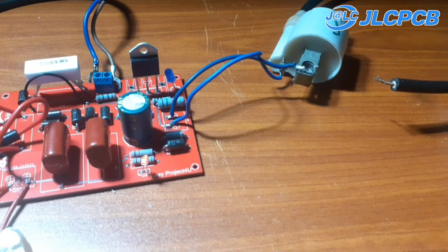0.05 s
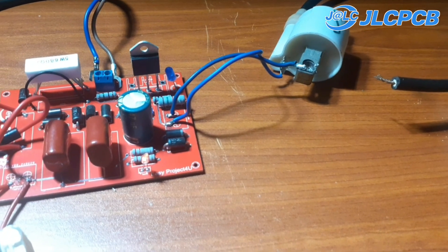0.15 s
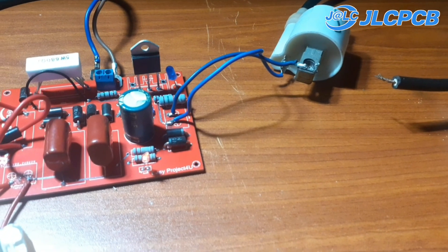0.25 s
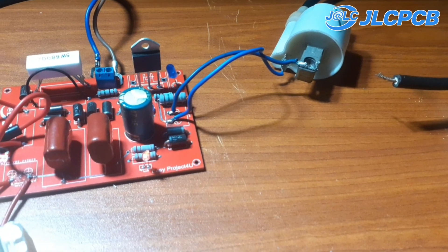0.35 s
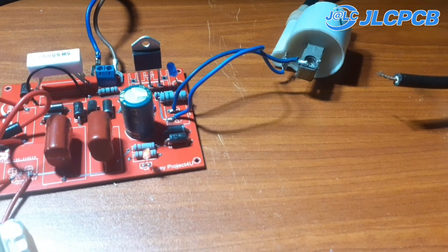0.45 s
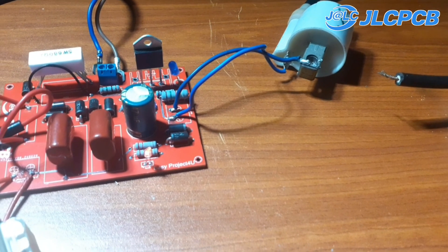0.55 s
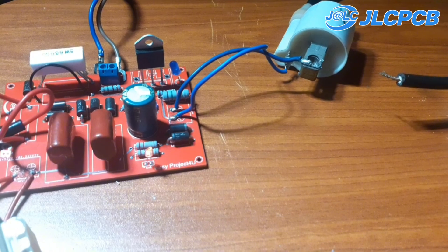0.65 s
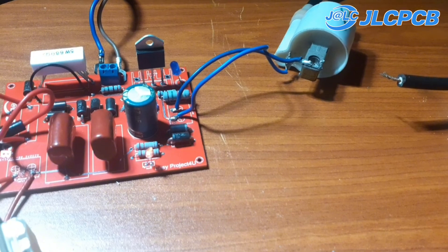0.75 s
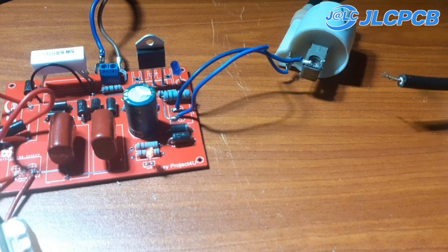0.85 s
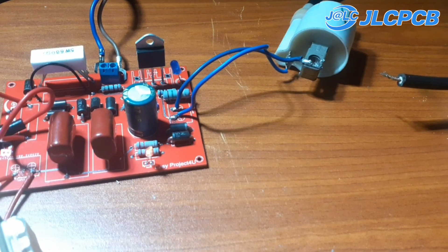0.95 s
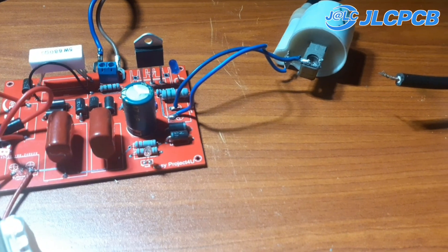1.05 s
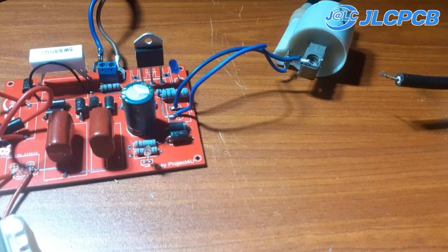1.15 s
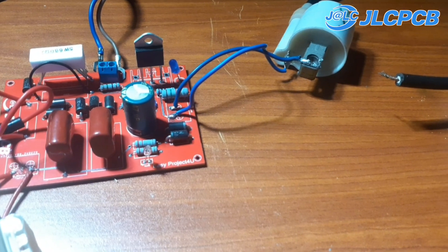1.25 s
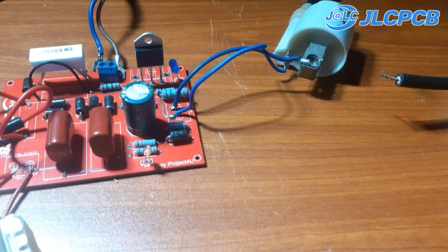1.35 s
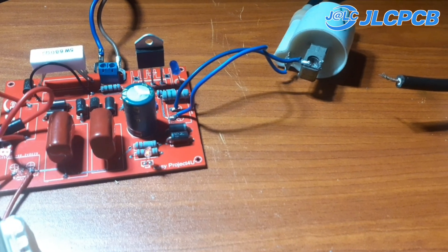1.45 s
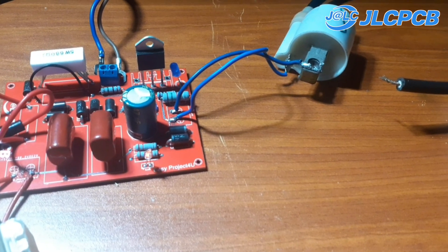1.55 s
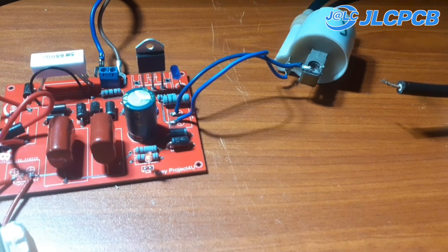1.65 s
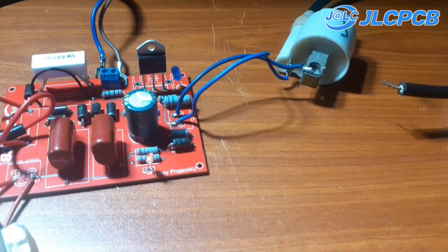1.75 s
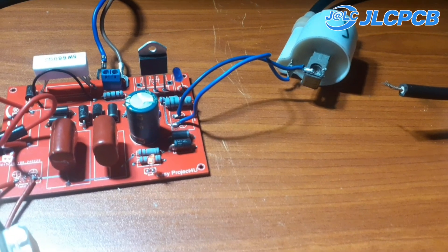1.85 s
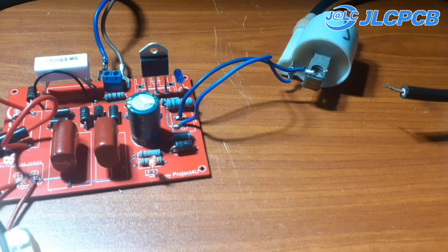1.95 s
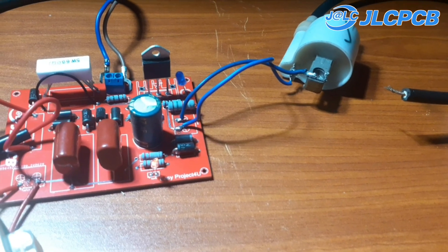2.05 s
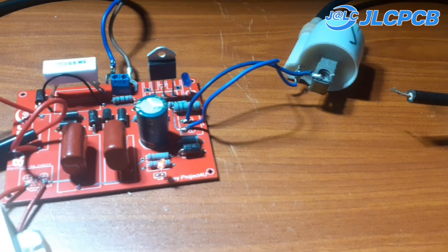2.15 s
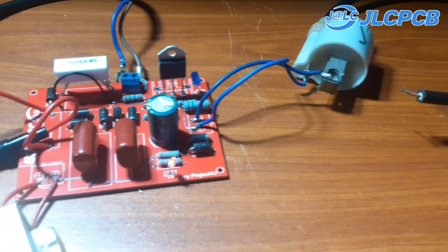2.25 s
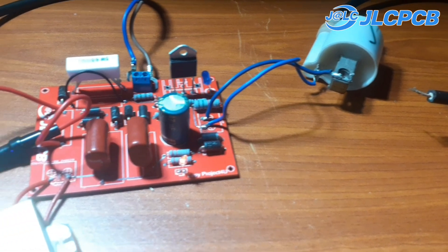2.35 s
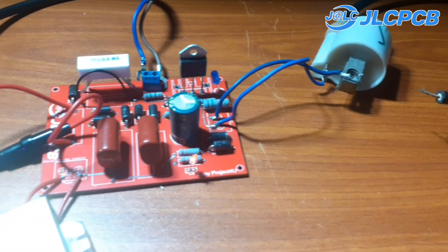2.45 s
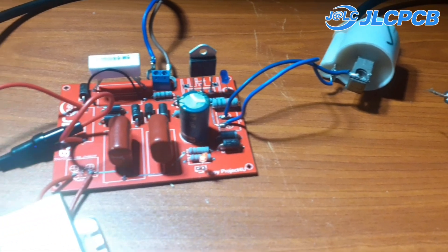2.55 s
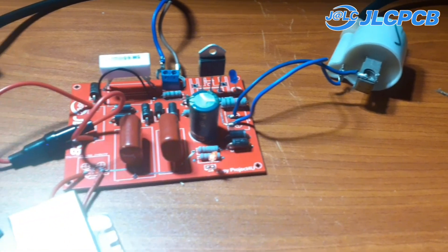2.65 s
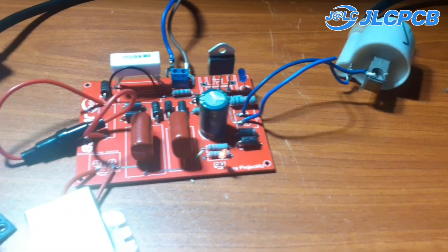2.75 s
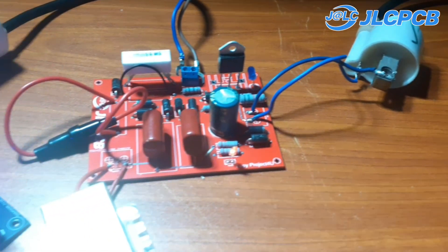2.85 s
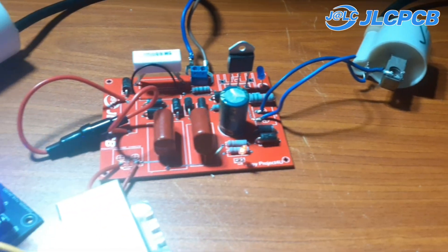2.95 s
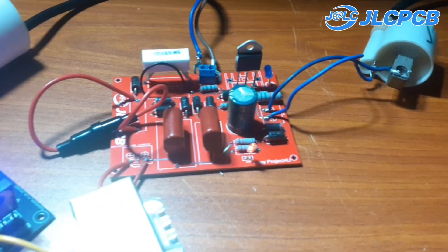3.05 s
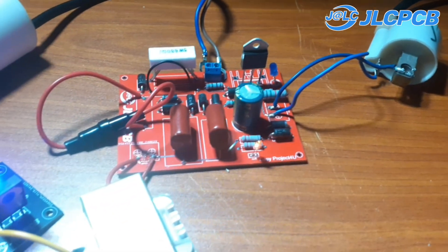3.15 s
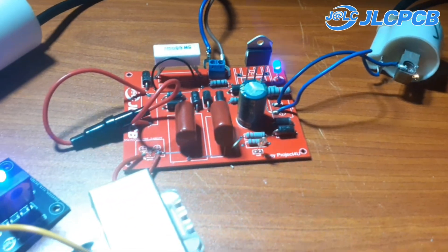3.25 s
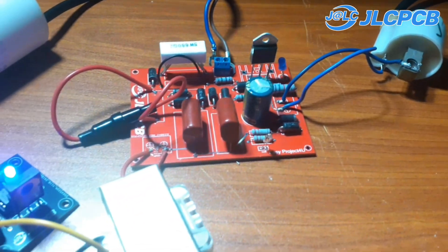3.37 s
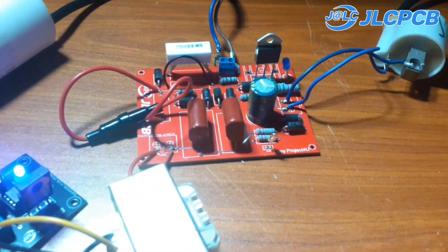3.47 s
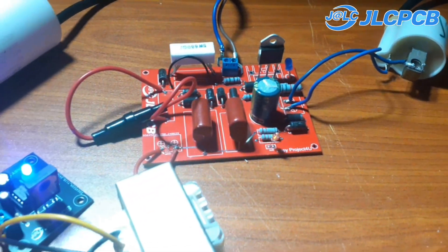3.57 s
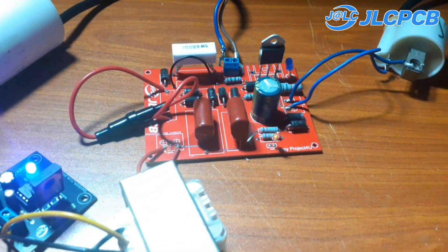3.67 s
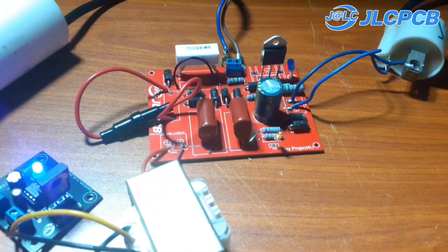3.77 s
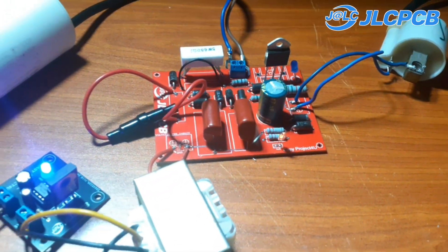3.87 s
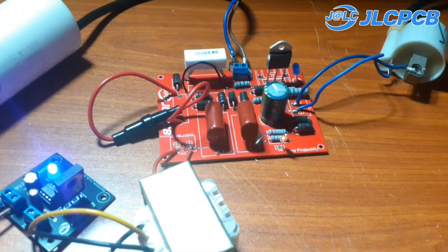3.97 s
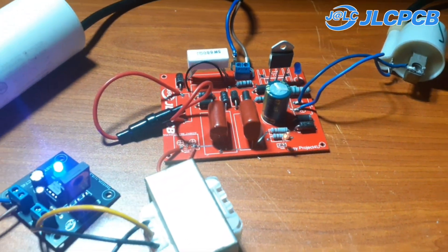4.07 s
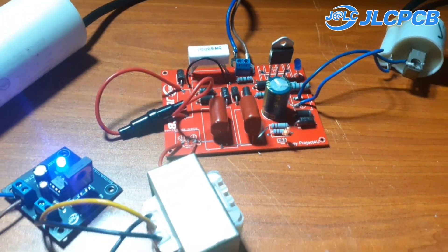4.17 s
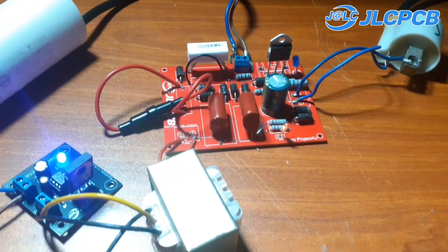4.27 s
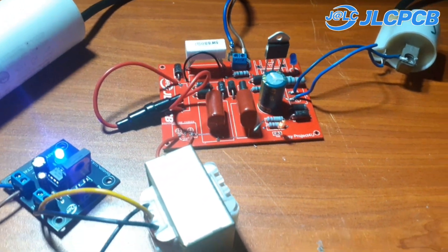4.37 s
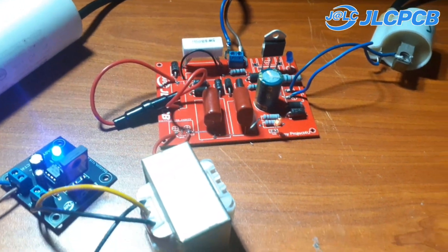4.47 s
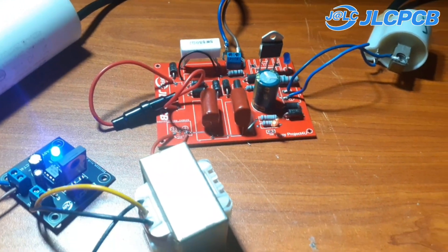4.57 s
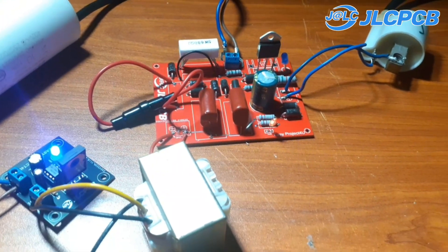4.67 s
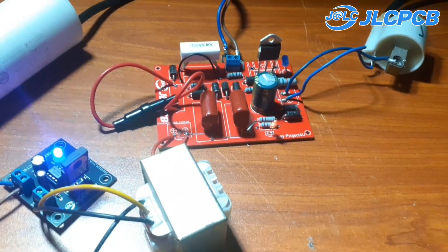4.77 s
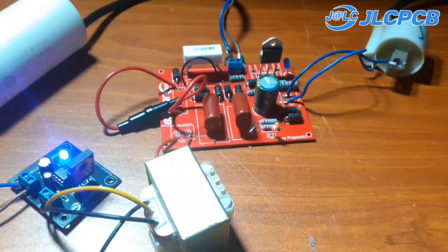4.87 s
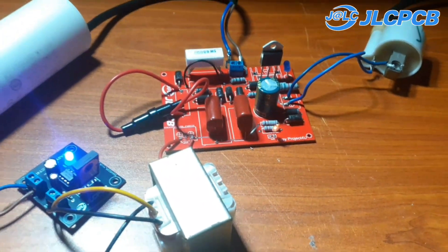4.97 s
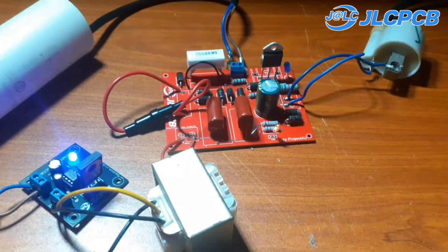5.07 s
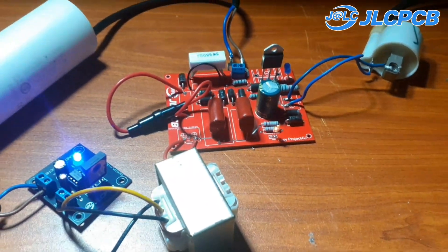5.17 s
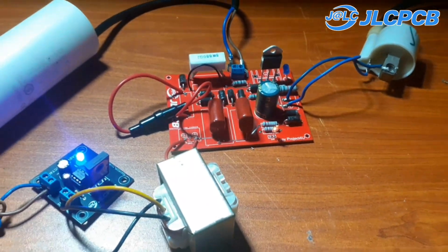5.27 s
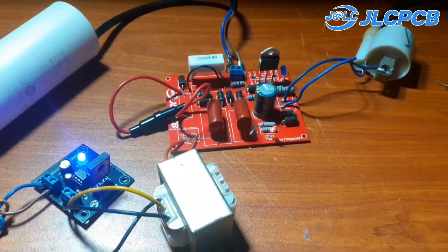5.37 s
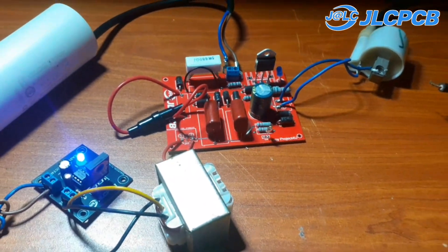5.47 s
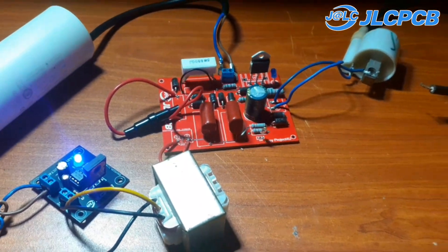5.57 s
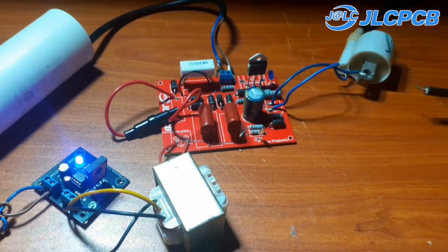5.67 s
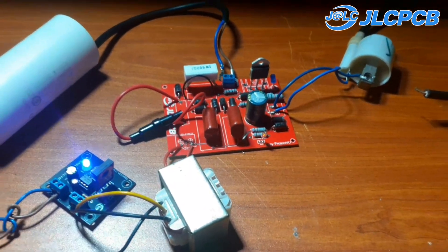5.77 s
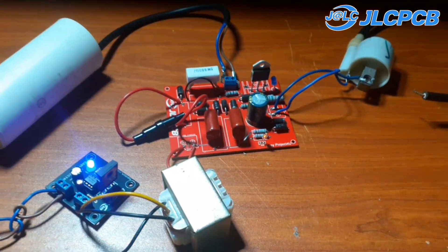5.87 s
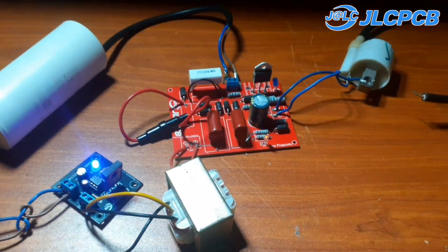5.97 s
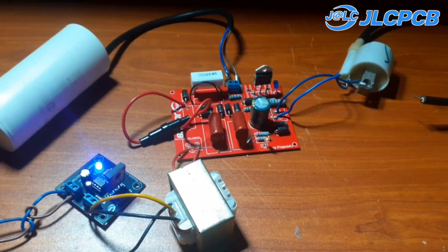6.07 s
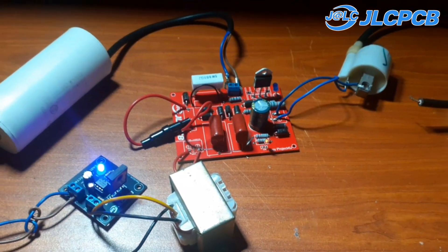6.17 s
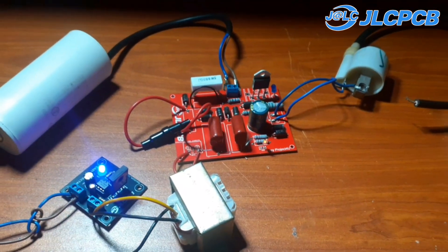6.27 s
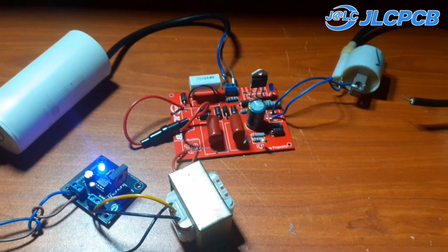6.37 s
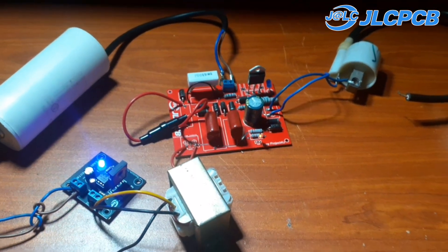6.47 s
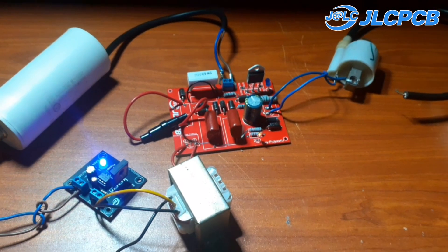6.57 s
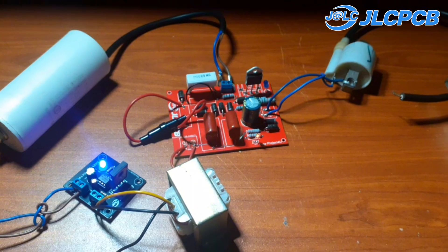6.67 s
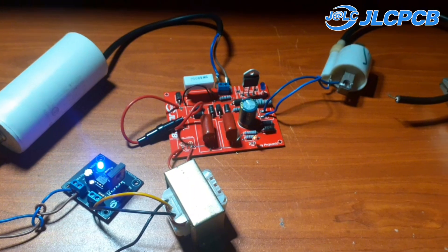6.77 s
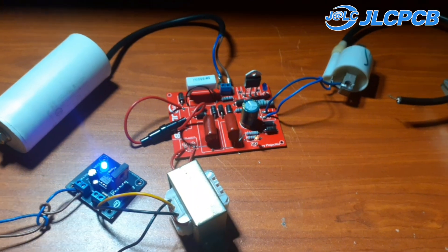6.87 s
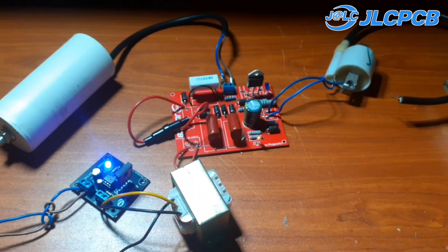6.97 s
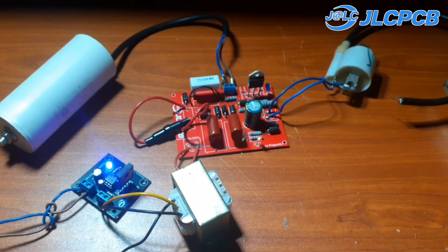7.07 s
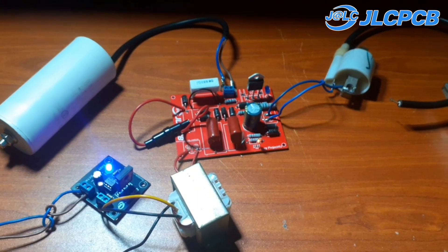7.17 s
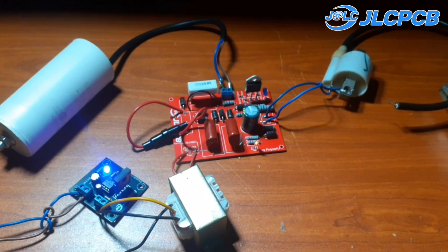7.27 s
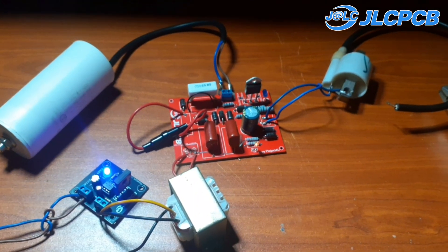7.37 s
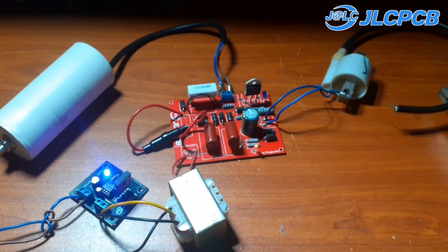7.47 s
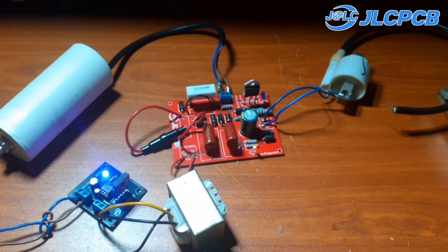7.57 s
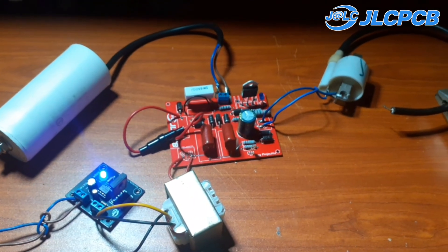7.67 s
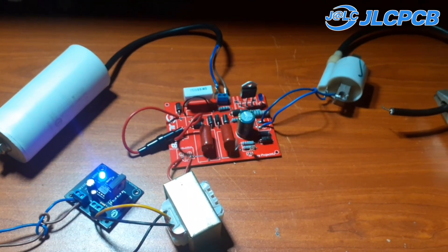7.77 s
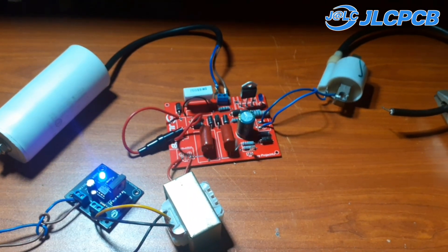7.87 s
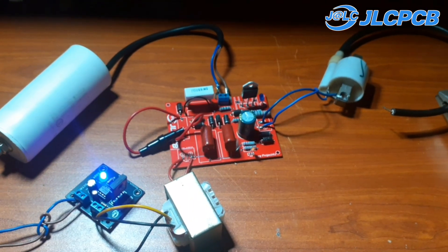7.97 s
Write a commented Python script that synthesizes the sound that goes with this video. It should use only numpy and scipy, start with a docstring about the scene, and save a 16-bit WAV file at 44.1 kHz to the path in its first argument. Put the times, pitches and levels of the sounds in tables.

```python
"""Spark gap on a desk

A small inverter buzzes faintly as it charges capacitors; every 2.2 s a coil snaps a spark across a gap.
The crack scatters off the desk, reverberates in a small room and overdrives a hand-held camera's two
ports. Behind it two detuned hums beat over the room's air, a faint whir swells and fades, one tap sounds."""
import sys
import numpy as np
from scipy import signal
from scipy.fft import rfft, irfft, next_fast_len
from scipy.io import wavfile
from scipy.ndimage import map_coordinates

SR = 44100
rng = np.random.default_rng(int(sys.argv[2]) if len(sys.argv) > 2 else 0)


def to_wav(sig):
    """Store sig (one row per channel, or 1-D mono) as 16-bit WAV at the path in sys.argv[1].

    Samples outside -1..1 are clipped; the rate is SR.
    """
    pcm = np.clip(np.atleast_2d(sig), -1, 1) * 32767
    pcm = np.round(pcm).astype(np.int16)
    wavfile.write(sys.argv[1], SR, pcm.T)  # frames by channels


N = 353682

# Discharges: t/s, crack gain/dB, body gain/dB, treble gain/dB, desk echo delay/ms, left minus right/dB,
# room gain/dB, left and right thump amplitude (signed)
SPARKS = [(1.0405, 8.3, -3, 0.23, 0.35, 4, -19.5, 0.2, -0.13),
          (3.2483, 9.7, 9, -0.81, 0.2, 2.5, -18.5, 0.079, -0.018),
          (5.4403, 1.4, 7.5, 1, 0.18, -0.5, -18.5, -0.21, 0.14),
          (7.6361, 5, 4, -0.63, 0.38, 3, -16, -0.14, -0.047)]


def amp(db):
    """Amplitude ratio: a factor of ten per 20 dB."""
    return 10 ** (np.asarray(db) / 20)


def unit(x):
    """Normalisation to an rms of 1."""
    return x / np.sqrt(np.mean(x ** 2, axis=-1, keepdims=True) + 1e-20)


def along(points, hz):
    """Interpolation of a table's columns on a logarithmic frequency axis."""
    f, *cols = np.transpose(points)
    return np.array([np.interp(np.log(hz + 1), np.log(f + 1), c) for c in cols])


def curves(rows):
    """Linear interpolation of a table's columns in time, one value per sample."""
    s, *cols = np.transpose(rows)
    return [np.interp(np.arange(N) / SR, s, c) for c in cols]


def wobble(rate):
    """Slow random modulation: a spline through `rate` knots a second."""
    return map_coordinates(rng.standard_normal(int(N * rate / SR) + 4), [np.arange(N) * rate / SR])


def filtered(x, response):
    """Linear filtering: the spectrum is multiplied by a frequency response."""
    m = 2 * next_fast_len(x.shape[-1] // 2 + 4096)
    return irfft(rfft(x, m) * response(np.fft.rfftfreq(m, 1 / SR)), m)[..., :x.shape[-1]]


def causal(points):
    """Minimum-phase response with the given gains: no output precedes its cause."""
    def response(hz):
        cepstrum = irfft(np.log(amp(along(points, hz))))
        half = cepstrum.shape[-1] // 2
        cepstrum[..., 1:half] *= 2
        cepstrum[..., half + 1:] = 0
        return np.exp(rfft(cepstrum))
    return response


def resonance(f, centre_hz, width_hz):
    """Response at f of two identical damped resonators in cascade."""
    return (1j * f * width_hz / (centre_hz ** 2 - f ** 2 + 1j * f * width_hz)) ** 2


def noise_band(hz, width_hz, alike):
    """Partly coherent stereo noise through a resonance, rms 1."""
    shared, own = rng.standard_normal(N), rng.standard_normal((2, N))
    return unit(filtered(alike * shared + (1 - alike) * own, lambda f: resonance(f, hz, width_hz)))


def room_tail(size):
    """Diffuse reverberation: noise decays exponentially, each frequency at its own rate."""
    decay_times = [(100, 1), (500, .36), (2000, 0.44), (6000, 0.42), (15000, .26)]  # f/Hz, T60/s
    hz, t, spectrum = signal.stft(rng.standard_normal((2, size)), SR, nperseg=256)
    decay = amp(-60 * t / along(decay_times, hz)[0][:, None])
    return signal.istft(spectrum * decay, SR, nperseg=256)[1][:, :size]


def switching_rate():
    """Loading: the inverter's rate in Hz sags at each discharge and recovers as charge builds."""
    full_hz, sag_hz, recharge_s, spark_period_s = 161.6, 2.0, 1.25, 2.2
    t, fired = np.arange(N) / SR, np.array([row[0] for row in SPARKS])
    fired = np.append(fired[0] - spark_period_s, fired)
    since = t - fired[np.searchsorted(fired, t) - 1]
    return full_hz - sag_hz * np.exp(-(since / recharge_s) ** 2)


def inverter():
    """Impulse excitation: the transformer core ticks once a cycle, heard directly and via the room."""
    # Ticks at the left port as the camera drifts: t/s, level/dB, level/dB near 10 kHz, near 12.5 kHz
    tick_levels = [(0, -63.5, -76.5, -75), (.38, -64, -75, -77), (.43, -59, -76, -72),
                   (1.04, -59.5, -76.5, -72), (1.4, -64.5, -77, -75.5), (2.03, -62, -73, -74),
                   (2.08, -58.5, -74.5, -71), (2.4, -58, -73.5, -68.5), (3.2, -59.5, -71.5, -76),
                   (4.3, -63.5, -75, -76), (5.4, -65, -80, -85), (5.8, -65.5, -80, -77),
                   (7, -65, -81.5, -90), (8, -64.5, -77, -86)]
    near_spectrum = [(1000, -34.5), (1500, -24.5), (2000, -14), (2400, -9), (2750, -2.5), (2950, -6.5),
                     (3350, 2.5), (3800, -5), (4350, -8), (4800, -26), (6500, -21.5), (8300, -25),
                     (16000, -39)]  # direct tick: f/Hz, gain/dB
    high_modes = [
        [(10156, 1400, 0)],
        [(11880, 440, 0.5), (13200, 700, -1)],
    ]  # two groups of modes: f/Hz, width/Hz, gain/dB
    far_spectrum = [(892, -45.5, -47.5), (1390, -17, -16), (1770, -15, -1.5), (2500, -18, -1.5),
                    (3620, -5, 2.5), (4370, -6.5, -17), (5460, -21, -25.5), (6400, -16.5, -9),
                    (8700, -20.5, -12.5), (9910, -12.5, -15.5), (13200, -20.5, -26.5),
                    (16000, -20.5, -34.5)]  # reverberant tick: f/Hz, left gain/dB, right gain/dB
    whine_levels = [(0, -72.5, -80), (2.2, -74.5, -73.5), (2.6, -71, -74.5), (3.3, -70.5, -85),
                    (4.4, -69.5, -99), (6.2, -73, -89.5), (7.1, -72.5, -85.5)]  # top whine: t/s, left level/dB, right level/dB
    core_harmonics = [(1, -81), (2, -82.5), (3, -87.5)]  # core hum: multiple of the switching rate, level/dB

    def modes(hz):
        return np.array([sum(amp(db) * resonance(hz, centre, width) for centre, width, db in group)
                         for group in high_modes])

    half_phase = np.pi * (np.cumsum(switching_rate()) / SR + .0006 * wobble(82))  # slight jitter
    ticks = np.sin(205 * half_phase) / np.sin(half_phase) - 1  # 102 equal harmonics
    ticks *= 1 + 0.14 * wobble(160) + 0.094 * rng.standard_normal(N)
    direct_db, *treble_db = curves(tick_levels)
    direct = amp(direct_db) * unit(filtered(ticks, causal(near_spectrum)))
    direct += np.sum(amp(treble_db) * unit(filtered(ticks, modes)), axis=0)
    step, far = round(1.6 * SR), np.zeros((2, N))
    for centre in range(0, N + step, step):  # room paths cross-fade as the camera moves
        span = np.arange(max(centre - step, 0), min(centre + step, N))
        fade = np.cos(np.pi / 2 * (span - centre) / step)
        drive = ticks[abs(np.arange(span[0] - 8191, span[-1] + 1))]
        far[:, span] += fade * signal.oaconvolve(drive[None], room_tail(8192), "valid", axes=1)
    far = unit(filtered(far, lambda hz: amp(along(far_spectrum, hz)))) * amp([[-71.5], [-65.5]])
    ring = unit(filtered(ticks, lambda hz: resonance(hz, 15450, width_hz=500)))
    whine = ring * amp(curves(whine_levels)) * [[1], [-1]]  # opposite phase at the two ports
    core = sum(np.sqrt(2) * amp(db + 0.7 * wobble(1.9)) * np.sin(2 * multiple * half_phase)
               for multiple, db in core_harmonics)
    return direct * amp([[0], [-18]]) + far + whine + core


def hums():
    """Beating: a steady tone and a drifting lower one swell and cancel at their difference frequency."""
    drift = [(0, 1.93, -67, 0.9), (3.15, 1.8, -64, 0.66), (3.3, 1.45, -65, .85), (4.7, 1.5, -63.5, .9),
             (5.6, 2.1, -66, 0.8), (7.5, 2.46, -65.5, 0.53), (8.02, 2, -64.5, .6)]  # t/s, detuning/Hz, lower tone's level/dB, amplitude ratio upper to lower
    overtones = [(2, -11), (4, -17)]  # harmonic number, gain/dB
    upper_hz = 51.5
    detuning_hz, level_db, ratio = curves(drift)
    upper = 2 * np.pi * upper_hz * np.arange(N) / SR
    lower = upper - 2 * np.pi * np.cumsum(detuning_hz) / SR - np.pi
    tone = ratio * np.sin(upper) + np.sin(lower)
    for multiple, db in overtones:
        tone += amp(db) * (np.sin(multiple * upper) + .5 * np.sin(multiple * lower))
    return amp(level_db) * tone * amp([[-.5], [.5]])


def air():
    """Partly coherent background noise, with a fluttering hiss and a wavering low murmur."""
    noise_floor = [(25.3, -125, -123), (58.6, -101, -87), (265, -105, -102), (508.5, -113, -110),
                   (850, -124, -122), (1220, -123, -121), (1616, -115, -113), (2500, -115, -114),
                   (4500, -119, -121), (5400, -125, -125), (6440, -120, -118), (8600, -127, -121),
                   (12000, -126, -130), (15400, -119, -125)]  # room air and camera hiss: f/Hz, left and right level/dB in a 1 Hz band
    coherence = [(60, 0.2), (300, 1), (700, 0.96), (1500, 0.12)]  # f/Hz, left-right correlation

    def mid_side_gains(hz):
        angle = np.arccos(np.clip(along(coherence, hz)[0], -1, 1)) / 2
        return np.array([np.cos(angle), np.sin(angle)])

    mid, side = filtered(rng.standard_normal((2, N)), mid_side_gains)
    bed = filtered(np.array([mid + side, mid - side]), lambda hz: amp(along(noise_floor, hz)))
    bed *= np.sqrt(SR / 2) * amp(1.3 * wobble(0.68))
    flutter = amp(4.3 * wobble(13)) * noise_band(6600, 800, alike=0.36) * amp([[-88], [-84]])
    murmur = amp(-81.5 + 4 * wobble(5)) * noise_band(250, 30, alike=0.56)
    return bed + flutter + murmur


def whirs():
    """Amplitude modulation: Gaussian envelopes shape three noise bands into whirs, low tones into bumps."""
    swells = [(.15, -77.5), (.62, -73.5), (1.35, -77.5), (1.85, -78), (2.33, -74.5), (2.82, -74),
              (3.7, -72.5), (4.15, -74.5), (4.55, -76), (4.95, -75.5), (5.35, -72), (5.83, -73.5),
              (6.2, -75), (6.57, -72.5), (6.961, -73), (7.421, -75)]  # crest t/s, level/dB
    low_bumps = [(1.361, -69, 205, 0.054), (3.78, -75.5, 255, 0.075), (4.0, -69, 200, 0.084)]  # t/s, peak level/dB, f/Hz, width/s
    t, swell_width_s = np.arange(N) / SR, 0.11
    swell = sum(amp(db) * np.exp(-.5 * ((t - s) / swell_width_s) ** 2) for s, db in swells)
    middle = noise_band(1780, 450, alike=0.2) * amp([[-3], [2]])
    low = noise_band(481, 85, alike=0.56) * amp(-3.5)
    high = noise_band(6600, 800, alike=.3) * amp([[-12], [-9]])
    bumps = sum(amp(db) * np.exp(-.5 * ((t - s) / width) ** 2) * np.sin(2 * np.pi * hz * t)
                for s, db, hz, width in low_bumps)
    return swell * (low + middle + high) + bumps


def butterworth(x, order, hz, kind):
    """Filtering with a maximally flat passband."""
    return signal.sosfilt(signal.butter(order, hz, kind, fs=SR, output="sos"), x)


def sparks():
    """A shock front, followed by its desk reflection, scattering from nearby things and reverberation."""
    crack_spectrum = [(70, -22, -26), (200, -3, -6), (1000, -1, -2), (2200, 0, 0), (3300, 1, 0),
                      (4300, -3, -1), (6000, -8, -5), (8300, -9, 1), (9800, -9, -8), (11500, -7, -10),
                      (16000, -10, -12)]  # direct sound: f/Hz, left gain/dB, right gain/dB
    scatter_spectrum = [(149.96, -22.5, -19.5), (458, -14, -13), (830, -3.5, -5.5), (1300, -6, -4),
                        (2000, -2.5, -1), (3200, -1.5, 1), (3800, -2.5, -1.5), (5440, -5, -3.5),
                        (6900, -6.5, -2), (8400, -1.5, 4), (9400, -14, -8.5), (11400, -4.5, -7.5),
                        (16070, -13, -4.5)]  # scattered sound: f/Hz, left gain/dB, right gain/dB
    sizzle_t60_s, nearby_t60_s, first_wall_s = .0028, 0.092, .013
    size = SR // 2
    out, t = np.zeros((2, N + size)), np.arange(size) / SR
    for s, db, body_db, treble_db, echo_ms, pan_db, room_db, *_ in SPARKS:
        front = np.zeros((2, size))
        front[:, 0] = -1
        front[:, round(echo_ms * SR / 1000)] -= .6
        sizzle = butterworth(rng.standard_normal((2, size)), 2, 1500, "high")
        front += .55 * amp(-60 * t / sizzle_t60_s) * sizzle
        front += (amp(body_db) - 1) * butterworth(front, 1, [200, 1300], "band")
        nearby = amp(2.5 - 60 * t / nearby_t60_s) * rng.standard_normal((2, size))
        walls = room_tail(size) * (amp(-3.5) + (1 - amp(-5.0)) * (t > first_wall_s))
        walls *= amp(1.5 * np.repeat(rng.standard_normal(size // 49), 49))  # echoes arrive in clumps
        crack = amp(db + pan_db * np.array([[.5], [-.5]])) * filtered(front, causal(crack_spectrum))
        heard = crack + amp(room_db) * filtered(nearby + walls, causal(scatter_spectrum))
        heard += (amp(treble_db) - 1) * butterworth(heard, 2, 5500, "high")
        out[:, round(s * SR):][:, :size] += heard
    return out[:, :N]


def port_thumps():
    """Overload recovery: the blast knocks each port off centre; it swings back with falling pitch."""
    half_swing_s, slowing, settle_s, rise_s = 0.0025, 0.61, 0.02, 0.0001
    out, t = np.zeros((2, N)), np.arange(SR // 8) / SR
    envelope = np.exp(-(t / settle_s) ** 1.6) * (1 - np.exp(-t / rise_s))
    swing = envelope * np.sin(np.pi * ((t / half_swing_s) ** slowing + .5))
    for s, *_, left, right in SPARKS:
        out[:, round(s * SR):][:, :len(t)] -= np.outer([left, right], swing)
    return out


def tap():
    """Free decay of two heavily damped modes: one dry click."""
    onset_s, gain_db = 3.7282, -29.5
    t, out = np.arange(400) / SR, np.zeros(N)
    ring = np.sin(2 * np.pi * 3000 * t) * amp(-60 * t / 0.0013)
    ring += 0.15 * np.sin(2 * np.pi * 1500 * t) * amp(-60 * t / 0.0065)
    out[round(onset_s * SR):][:len(t)] = amp(gain_db) * ring
    return butterworth(out, 8, 1200, "high") * amp([[5], [-22]])


def scene():
    """Superposition of all sources at the two ports."""
    return sparks() + port_thumps() + inverter() + hums() + air() + whirs() + tap()


def record(dry):
    """Saturation rounds off the peaks; a steep low-pass limits the bandwidth."""
    ceiling, cutoff_hz = .9, 15820
    soft = dry / (1 + abs(dry / ceiling) ** 6) ** (1 / 6)
    return filtered(soft, lambda hz: 1 / (1 + (hz / cutoff_hz) ** 300))


dry = scene()
out = record(dry)
to_wav(out)
```